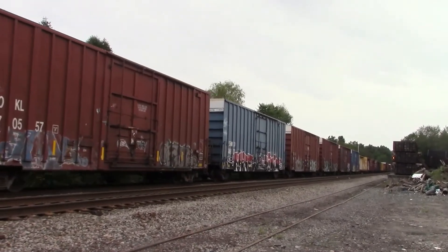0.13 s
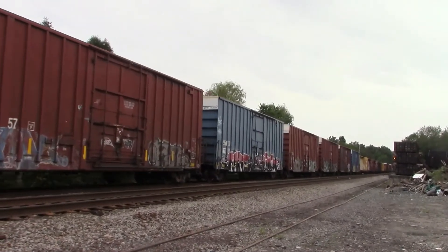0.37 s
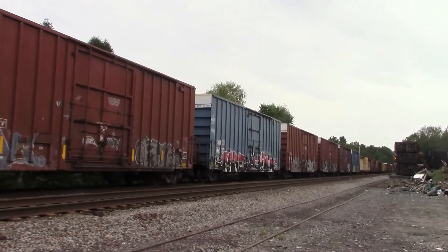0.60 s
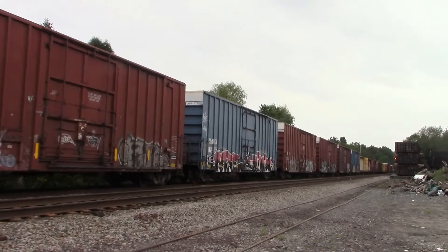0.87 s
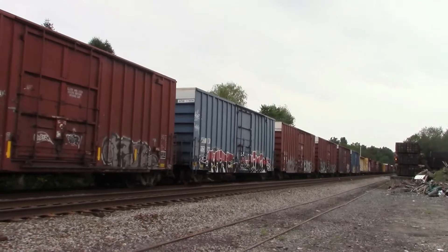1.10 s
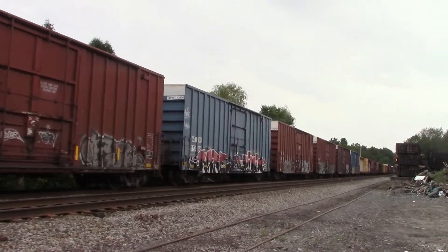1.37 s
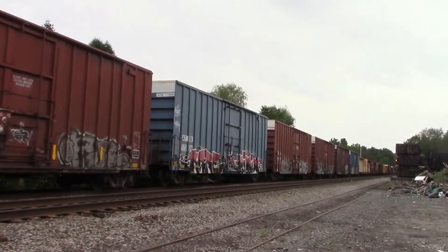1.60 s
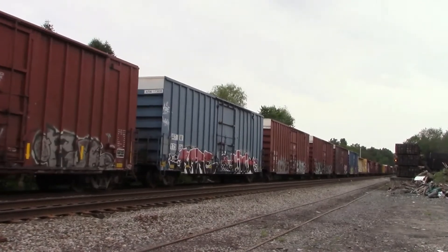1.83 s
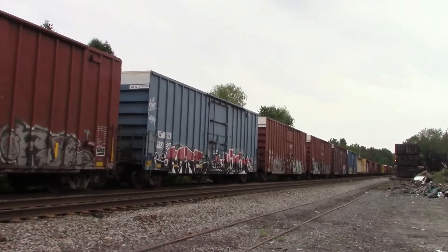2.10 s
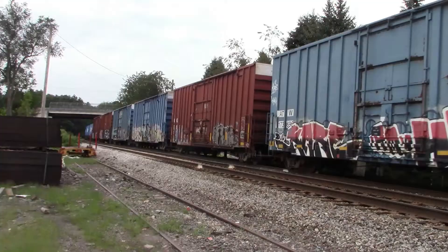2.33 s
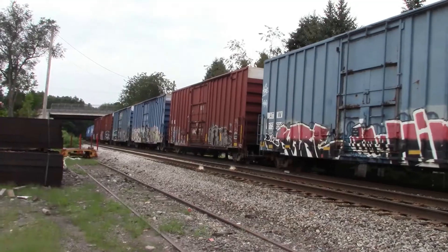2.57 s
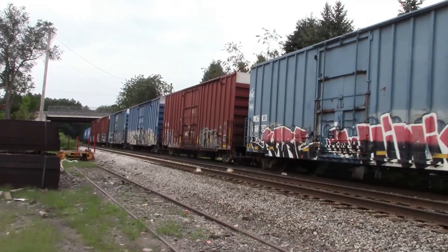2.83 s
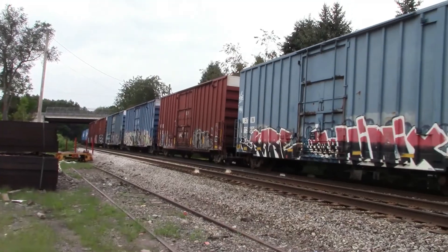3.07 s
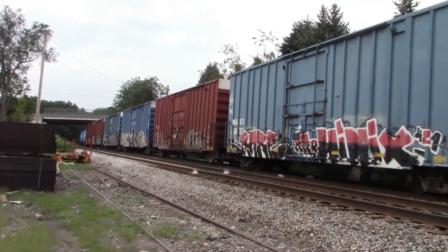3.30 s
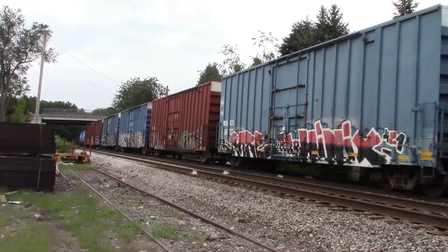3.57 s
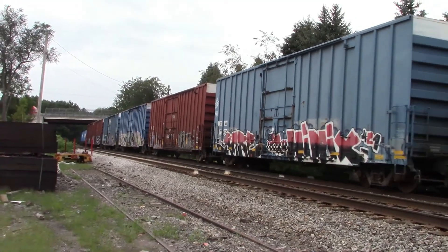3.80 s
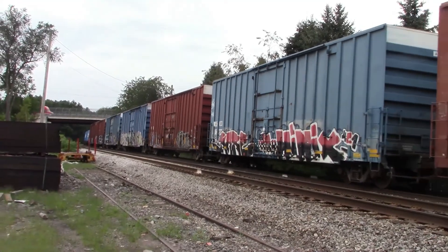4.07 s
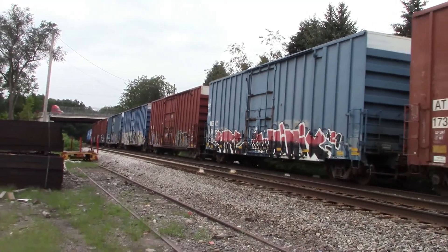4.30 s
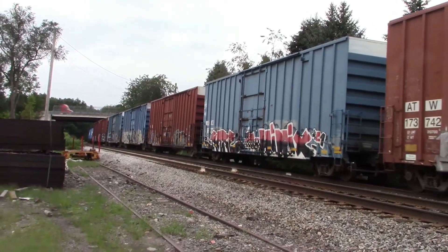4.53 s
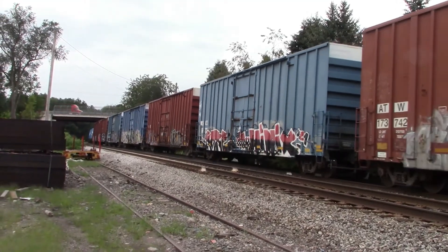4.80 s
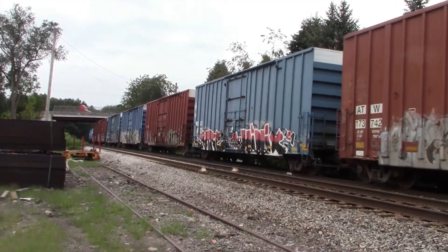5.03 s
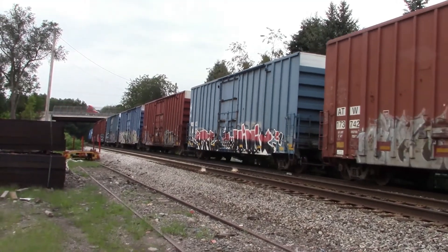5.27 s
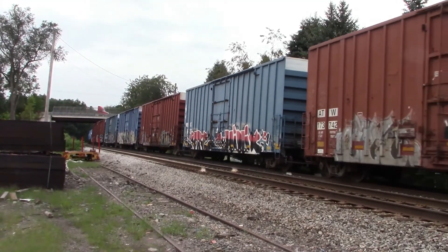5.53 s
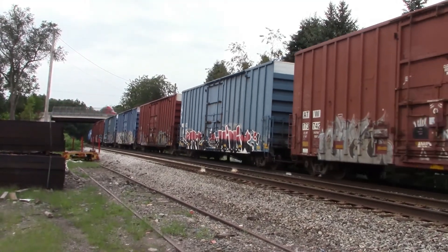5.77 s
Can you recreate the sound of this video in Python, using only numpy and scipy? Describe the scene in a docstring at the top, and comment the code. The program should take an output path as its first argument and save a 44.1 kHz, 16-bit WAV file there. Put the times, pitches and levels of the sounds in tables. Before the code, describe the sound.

Close, nearly centred stereo of boxcars rolling slowly over rail joints in the open air. Continuous low-mid rumble and fine loose-iron rattle carry irregular dull thuds, metallic clacks, short booms and wheel squeaks. High scraping hiss appears early; an abrupt brief silence separates the two views. Afterwards the roar surges more strongly about every 0.6 seconds, with dry ticks and a heavy final cluster.

```python
"""Slow boxcars on jointed track

A slow freight train passes a close pair of microphones beside the ballast, the cars nearly ahead.
Banded noise makes the rolling roar, swelling once a wheel turn; damped swings and bursts make the
thuds, knocks and clacks of joints and loose iron. Resonated noise and wavering sines make booming
bodies, ringing and squealing wheels, ticks and rattle. The sound drops out for a fifth of a second,
then fades back in with the roar coloured differently.
"""
import sys
import numpy as np
from scipy import signal
from scipy.io import wavfile
from scipy.ndimage import uniform_filter1d

SR = 44100
rng = np.random.default_rng(int(sys.argv[2]) if len(sys.argv) > 2 else 0)


def field_ratio(decibels):
    """Amplitude ratio for a level in dB (20 dB per decade); scalars and array-likes work."""
    return 10 ** (np.asarray(decibels, dtype=float) / 20)


def dump_mix(stems):
    """Bounce the given channels to the path in sys.argv[1] as a 16-bit WAV at rate SR."""
    frames = np.atleast_2d(stems).T  # one column per channel
    limited = np.clip(frames, -1, 1)  # hard clip at full scale
    pcm = np.round(limited * 32767).astype(np.int16)
    wavfile.write(sys.argv[1], SR, pcm)


N = 259749


def in_time(rows):
    """Columns of a curve at every sample."""
    s, *columns = np.transpose(rows)
    return np.array([np.interp(np.arange(N) / SR, s, c) for c in columns])


def at_hz(points, hz):
    """A spectrum read on a log-frequency axis."""
    f, value = np.transpose(points)
    return np.interp(np.log(hz), np.log(np.maximum(f, 1)), value)


def rms_one(x):
    """Scaled to rms 1."""
    return x / np.sqrt(np.mean(x ** 2) + 1e-20)


def drift(rate_hz):
    """Slow chance of spread 1: low-passed noise, drawn at every 40th sample."""
    r = np.exp(-2 * np.pi * rate_hz * 40 / SR)
    noise = rng.standard_normal(N // 40 + 2002)
    slow = rms_one(signal.lfilter([1], [1, -2 * r, r * r], noise)[2000:])
    return np.interp(np.arange(N) / 40, np.arange(len(slow)), slow)


def resonate(x, hz, width_hz):
    """Two-pole resonance, gain 1 on top."""
    r = np.exp(-np.pi * width_hz / SR)
    numerator = [(1 - r * r) / 2, 0, (r * r - 1) / 2]
    return signal.lfilter(numerator, [1, -2 * r * np.cos(2 * np.pi * hz / SR), r * r], x)


# A worn wheel loads the rail once a turn, about every 0.61 s:
# t/s, swell level/dB, tilt/dB per octave
WHEEL_TURNS = [(0.26, -0.5, 1.2), (0.87, 1, 1), (1.48, -2.5, 0), (2.08, -1, 0), (2.71, 3, -1.6),
               (3.331, 4, -0.5), (3.96, 3, -0.5), (4.57, 1.5, 1.3), (5.19, 3.5, -0.5), (5.81, 7.5, -3.4)]


def swells():
    """Swell and tilt in dB as a worn wheel turns: a rounded rise and a flatter-topped fall."""
    rise_s, fall_s = 0.08, 0.16
    swell_db, tilt_db, t = 0, 0, np.arange(N) / SR
    for s, db, tilt in WHEEL_TURNS:
        rise = ((s - t) / rise_s) ** 2
        fall = (abs(t - s) / fall_s) ** 4.1
        shape = np.exp(-np.where(t < s, rise, fall))
        swell_db, tilt_db = swell_db + db * shape, tilt_db + tilt * shape
    return swell_db, tilt_db


# Stereo width at the microphone pair: f/Hz, side minus mid level/dB
SIDE_SHARE = [(60, -34), (130, -41), (290, -26.5), (640, -23), (1410, -16), (3100, -12.5), (6820, -8),
              (15000, -21.5)]


def bands(low_hz, count):
    """Third-octave bands of mid and side noise, unrelated between neighbours: (centre, L and R)."""
    white = rng.standard_normal((2, 2, N + 4096))
    for k in range(count):
        low, high = low_hz * 2 ** (k / 3), low_hz * 2 ** ((k + 1) / 3)
        band = signal.butter(2, [low, high], "band", fs=SR, output="sos")
        mid, side = signal.sosfilt(band, white[k % 2])[:, 4096:]
        hz = np.sqrt(low * high)
        yield hz, mid + field_ratio(at_hz(SIDE_SHARE, hz)) * side * [[1], [-1]]


# Rolling spectrum beside the track: f/Hz, relative level per Hz/dB
ROAR = [(15, -57.5), (25, -19.5), (82, -1), (267, 1), (349, -7.5), (421, -5), (523, -9), (598, -7),
        (1050, -18.5), (2630, -23.5), (4380, -31), (5280, -38.5), (6920, -33.5), (10100, -50), (15500, -65)]
# How near and open to the ear the passing wheels are: t/s, level/dB, brightness/dB per octave
PASSING = [(0, -3, 0), (0.45, -1.5, -0.04), (0.75, -1.5, -0.5), (1.1, -1, 0.15), (1.36, -1.5, 0.5),
           (1.65, -1.5, 0.63), (2.1, -1, 0), (2.5, -2, 0), (2.9, -1.5, 0.86), (3.2, -2, -0.73),
           (3.75, 0, 0.22), (4.2, -1, 0.1), (4.45, 1, -0.5), (5.0, -1, 0), (5.4, 0.5, 0.5),
           (5.68, -1.5, 0.5), (5.89, -4.5, 1.5)]
# How strongly each pitch follows the swell: f/Hz, share of the swell
SWELL_REACH = [(60, 0.67), (150, 0.4), (250, 0.41), (550, 1.07), (1500, 0.84), (3000, 1.02), (8000, 0.45)]
# First view, colour added to the roar before the dropout: f/Hz, level/dB
FIRST_VIEW = [(60, 3), (130, 0.65), (300, 2), (600, 1.5), (1200, 1.5), (2800, 2.1), (6000, 1.4),
              (12000, -5.5)]


def rolling():
    """Rough wheel on rough rail: noise follows the passing wheels and turns, flickering partly in step."""
    level_db, bright_db = in_time(PASSING)
    swell_db, tilt_db = swells()
    first_view = np.arange(N) / SR < 2.2505   # ends within the silence
    together_db, out = drift(3.0) + 0.62 * drift(30), 0
    for hz, noise in bands(22.65, count=29):
        octaves = np.log2(hz / 800)
        view_db = at_hz(FIRST_VIEW, hz) * first_view
        near_db = level_db + bright_db * octaves
        turn_db = at_hz(SWELL_REACH, hz) * (swell_db + tilt_db * octaves)
        flicker_db = together_db + 1.2 * drift(8.7)
        out = out + field_ratio(at_hz(ROAR, hz) + view_db + near_db + turn_db + flicker_db) * noise
    return field_ratio(-15.5) * rms_one(out)


# Wheels dropping over joints, heard in the car body: t/s, main swing level/dB, f/Hz
THUDS = [(0.519, -5, 286), (0.806, -10, 269), (1.159, -9, 329), (1.461, -8.5, 276), (1.553, -14, 243),
         (1.625, -10.5, 277), (1.709, -12.5, 241), (1.748, -9.5, 281), (2.074, -15.5, 309),
         (2.448, -5, 182), (2.55, -11.5, 193), (2.663, -8.5, 386), (2.698, -10, 209), (3.276, -7, 240),
         (3.285, -4.5, 249), (3.317, -2.5, 239), (3.352, -13.5, 604), (3.912, -7, 232), (4.041, -29, 231),
         (4.092, -6.5, 224), (4.527, -7, 298), (5.232, -5.5, 198), (5.335, -13.5, 272), (5.385, -10, 207.6),
         (5.438, -10, 230), (5.491, -11, 204), (5.599, -14.5, 178), (5.788, -8, 458), (5.815, -8.5, 268),
         (5.838, -15, 293)]


def thuds():
    """A soft blow: the body swings up in a cycle or so and dies in a few."""
    cycles = 8.4   # for a 60 dB fall
    out = np.zeros(N)
    for (s, db, hz), (phase, phase_2) in zip(THUDS, rng.random((len(THUDS), 2))):
        start = round(s * SR)
        t = np.arange(min(4000, N - start)) / SR
        fall = field_ratio(-60 * t * hz / cycles)
        shape = (1 - np.exp(-t * hz / 2.2)) ** 2 * fall
        swing = np.sin(2 * np.pi * (hz * t + phase))
        swing += field_ratio(-8) * np.sin(2 * np.pi * (1.588 * hz * t + phase_2))
        # a higher knock dies faster still
        swing += field_ratio(-10) * fall * np.sin(2 * np.pi * (2.98 * hz * t + phase + phase_2))
        out[start:][:len(t)] += field_ratio(db) * shape / shape.max() * swing
    return out


# Hard, dull knocks of a wheel on a rail end: t/s, peak level/dB, length/s
KNOCKS = [(0.367, -4.5, 0.0078), (0.397, -12, 0.0045), (0.993, -7, 0.0064), (1.456, -7, 0.0062),
          (2.453, -5.5, 0.008), (2.508, -12, 0.006), (2.6, -5.5, 0.0065), (2.722, -4.5, 0.0068),
          (2.813, -13, 0.0044), (3.911, -5, 0.003), (3.958, -19, 0.0043), (4.161, -13, 0.0039),
          (3.975, -14, 0.005), (4.025, -8, 0.0045), (4.53, -9, 0.0043), (4.598, -6, 0.004),
          (5.151, -9, 0.0066), (5.741, -6.5, 0.0034), (5.787, -2, 0.0064)]


def knocks():
    """A push, a deep pull and a push back, over before anything rings."""
    out = np.zeros(N)
    for s, db, length in KNOCKS:
        phase = np.arange(round(length * SR)) / (length * SR)
        pulse = np.sin(np.pi * phase) * np.sin(3 * np.pi * phase)
        out[round(s * SR):][:len(phase)] += field_ratio(db) * pulse
    return out


# Iron on iron: t/s, relative level/dB at 4 kHz, brightness/dB per octave, 60 dB decay/s at 4 kHz
CLACKS = [(0.037, -20, -8.5, 0.21), (0.081, -21, 2, 0.15), (0.1387, -27.5, 12, 0.15),
          (0.2574, -16, 8, 0.23), (0.195, -27, -2, 0.39), (0.31, -20, -3, 0.22), (0.494, -15.5, -2, 0.6),
          (0.86, -16, 0.5, 0.3), (0.872, -15.5, 2.5, 0.36), (0.9194, -29, 10, 0.14),
          (1.458, -13.5, -3, 0.34), (1.6064, -6, 0.5, 0.11), (1.6165, -24.5, 4, 0.28),
          (1.707, -9.5, 1.5, 0.12), (1.8147, -16.5, -6, 0.39), (1.927, -16, -1.5, 0.12),
          (2.0713, -12.5, 0.5, 0.32), (2.453, -19.5, -12, 0.086), (2.534, -15.5, -6, 0.144),
          (2.709, -20, -8.5, 0.22), (2.7974, -24.5, -7.5, 0.62), (3.163, -23.5, -7, 0.32),
          (3.334, -19, -4, 0.17), (3.4884, -17, -6, 0.3), (3.7824, -22.5, 5.5, 0.66),
          (3.8626, -26.5, 4, 0.11), (3.9304, -23, -6, 0.15), (3.9644, -18, -9.5, 0.18),
          (4.072, -19, -3, 0.65), (4.1594, -35, 21, 0.18), (4.4164, -17, 3, 0.16), (4.555, -15, -4, 0.18),
          (4.5735, -21, -7.5, 0.46), (4.9701, -18, -6, 0.045), (5.0487, -10.5, 1, 0.089),
          (5.16, -27, -6.5, 0.25), (5.195, -13, 0.5, 0.23), (5.3, -18.5, -5.5, 0.28),
          (5.349, -13.5, -3.5, 0.2), (5.4494, -22, 8, 0.12), (5.5342, -23.5, 12.5, 0.082),
          (5.7544, -29.5, 16, 0.15), (5.787, -18, -7.5, 0.35), (5.835, -14.5, 0, 0.2)]


def strikes(hz):
    """Envelope of all clacks at one pitch: treble dies sooner, each blow has its own colour."""
    rise_s, colour_db = 0.0022, 2.0
    out = np.zeros(N)
    for (s, db, bright_db, t60), own in zip(CLACKS, rng.standard_normal(len(CLACKS))):
        start = round(s * SR)
        t = np.arange(min(9000, N - start)) / SR
        fall = field_ratio(-60 * t / max(t60, 0.02) * (hz / 4000) ** 0.27)
        level_db = db + bright_db * np.log2(hz / 4000) + colour_db * own
        out[start:][:len(t)] += field_ratio(level_db) * fall * (1 - np.exp(-t / rise_s))
    return out


# Common spectrum of the clacks: f/Hz, relative level per Hz/dB
CLACK_COLOUR = [(350, -29), (600, -19), (1270, -8.5), (2440, -13), (3570, -6.5), (3920, -8), (5980, -20.5),
                (6850, -10), (15500, -67.5)]


def clacks():
    """Many close plate and rail modes at once: a burst that dies band by band."""
    out = 0
    for hz, noise in bands(703, count=14):
        out = out + field_ratio(at_hz(CLACK_COLOUR, hz)) * strikes(hz) * noise
    return field_ratio(5.0) * out


# The car body booms under a heavy wheel: t/s, length/s, f/Hz, rms level/dB before waver, width/Hz
BOOMS = [(1.47, 0.17, 275, -18, 45), (3.408, 0.05, 272, -15.5, 40), (3.95, 0.16, 234.6, -17.5, 45.6)]


def booms():
    """A body mode held by the load: noise twice through one resonance, evened, between soft edges."""
    edge_s, waver_db = 0.0096, 4.5
    out = np.zeros(N)
    for s, length, hz, db, width_hz in BOOMS:
        start = round(s * SR)
        n = min(round(length * SR), N - start)
        tone = resonate(resonate(rng.standard_normal(30000), hz, width_hz), hz, width_hz)
        even = tone / np.sqrt(abs(uniform_filter1d(tone ** 2, size=600)) + 1e-20)
        t = np.arange(n) / SR
        edges = np.clip(np.minimum(t, length - t) / edge_s, 0, 1)
        level = field_ratio(db + waver_db * drift(35)[start:start + n])
        out[start:start + n] += level * edges * even[-n - 600:-600]
    return out


# Flange rubbing the rail: t/s, hold/s, relative level/dB
RUBS = [(0.999, 0.085, 5.5), (1.1, 0.19, 3.5), (1.36, 0.05, -2), (2.11, 0.071, 2.5), (4.129, 0.12, -2),
        (5.449, 0.016, -2), (5.567, 0.078, -1.5), (5.774, 0.12, -1.5)]


def rubbing_db():
    """A light touch throughout; each rub sets in fast, holds and lets go."""
    attack_db_per_s, release_db_per_s, light_db = 348, 118, -12.5
    out, t = np.full(N, light_db), np.arange(N) / SR
    for s, hold, db in RUBS:
        before = attack_db_per_s * np.maximum(s - t, 0)
        after = release_db_per_s * np.maximum(t - s - hold, 0)
        out = np.maximum(out, db - before - after)
    return out


def flange_hiss():
    """Rubbing makes a broad hiss of band-passed noise, mostly in the middle."""
    band = signal.butter(3, [7300, 10660], "band", fs=SR, output="sos")
    mid, side = signal.sosfilt(band, rng.standard_normal((2, N)))
    hiss = rms_one(mid + 0.14 * side * [[1], [-1]])
    return field_ratio(-44 + rubbing_db() + drift(40)) * hiss


# Narrow modes of the wheel: f/Hz, relative level/dB
WHEEL_MODES = [(1510, -49.5), (2270, -50.5), (2500, -56), (2640, -47), (3050, -57), (3320, -68),
               (3800, -53), (4500, -53.5), (4861, -54.5), (6794, -58), (7020, -59), (7500, -57),
               (8263, -65.5), (8662, -71.5), (9760, -65.5), (10150, -69.5), (10487, -71), (10858, -75),
               (11558, -76.5)]


def wheel_ring():
    """The rubbing flange and the clacks feed noise into the wheel's narrow modes."""
    rub_db, width_hz, out = rubbing_db(), 28.0, np.zeros((2, N))
    for hz, db in WHEEL_MODES:
        mid, side = rng.standard_normal((2, N))
        noise = mid + field_ratio(at_hz(SIDE_SHARE, hz)) * side * [[1], [-1]]
        rub = field_ratio(rub_db + 3 * drift(6))   # each mode comes and goes
        drive = noise * (rub + field_ratio(19.5) * strikes(hz))
        narrow_gain = np.sqrt(2 * SR / (np.pi * width_hz))   # makes up for the narrow band
        out += field_ratio(db) * resonate(drive, hz, width_hz) * narrow_gain
    return out


# Short rings and squeaks: t/s, length/s, f/Hz, level/dB before envelope and grip
SQUEAKS = [(0.252, 0.026, 1810, -28.5), (1.923, 0.05, 7100, -48), (2.076, 0.07, 6940, -35),
           (2.078, 0.026, 2330, -23), (2.067, 0.034, 1540, -29), (2.565, 0.017, 5900, -38),
           (2.696, 0.027, 1420, -22.5), (2.828, 0.074, 6900, -36), (3.333, 0.026, 2230, -25.5),
           (3.333, 0.024, 1650, -23), (3.641, 0.052, 9400, -46), (3.924, 0.046, 2300, -24.5),
           (3.928, 0.014, 2700, -26), (4.733, 0.043, 7940, -43), (5.505, 0.021, 5460, -38),
           (5.51, 0.05, 3960, -35), (5.6, .02, 3700, -35), (1.713, 0.016, 6600, -34.5),
           (5.795, 0.088, 2590, -31), (5.785, 0.029, 2190, -30)]


def squeaks():
    """One mode sings briefly and roughly: noise twice through a resonance, the shorter the wider."""
    out, grip = np.zeros(N), field_ratio(1.5 * drift(25))   # the contact grips and slips
    for s, length, hz, db in SQUEAKS:
        start = round(s * SR)
        n = min(round(length * SR), N - start)
        width_hz = 25 + 5.5 / length + hz / 300
        tone = resonate(resonate(rng.standard_normal(22000), hz, width_hz), hz, width_hz)[-n:]
        tone = tone / np.sqrt(abs(uniform_filter1d(tone ** 2, size=2200)))   # friction keeps it going
        hump = abs(np.sin(np.pi * (np.arange(n) / n) ** 0.45)) ** 0.8   # rises fast, falls slower
        out[start:start + n] += field_ratio(db) * hump * tone * grip[start:start + n]
    return out


# Thin, held wheel squeals: t/s, length/s, f/Hz, rms level/dB before waver, pitch waver/Hz
SQUEALS = [(0.17, 0.18, 3741, -38, 7), (0.18, 0.08, 3036, -40, 9), (0.23, 0.09, 4183, -43, 9),
           (0.24, 0.05, 1976, -33, 12), (0.3, 0.045, 2000, -33, 15), (0.34, 0.05, 1600, -33, 30),
           (0.87, 0.07, 2580, -37, 10), (0.96, 0.13, 4500, -43, 12), (1.11, 0.19, 4500, -44, 16),
           (0.99, 0.09, 2492, -39, 30), (1.16, 0.19, 2680, -44, 20), (1.44, 0.08, 4522, -42, 10),
           (1.0, 0.08, 7919, -50, 15), (0.99, 0.34, 9760, -57, 20), (0.99, 0.34, 10858, -58, 15),
           (0.99, 0.34, 11558, -64, 20), (4.647, 0.032, 2770, -30, 10), (5.55, 0.14, 2589, -41, 10),
           (5.52, 0.14, 7590, -53, 15), (5.78, 0.11, 3854, -37, 4), (5.79, 0.075, 4183, -43, 8),
           (5.78, 0.05, 1523, -31, 12)]


def squeals():
    """Stick-slip locks onto one wheel mode: a near sine whose pitch and level waver."""
    edge_s, waver_db = 0.015, 3.0
    out, wavers = np.zeros(N), np.array([drift(30), drift(30)])
    shifts = rng.integers(0, N // 2, len(SQUEALS))   # each squeal reads its own stretch of waver
    for (s, length, hz, db, waver_hz), shift in zip(SQUEALS, shifts):
        start = round(s * SR)
        t = np.arange(min(round(length * SR), N - start)) / SR
        pitch, level = wavers[:, shift:shift + len(t)]
        edges = np.clip(np.minimum(t, length - t) / edge_s, 0, 1)
        turns = np.cumsum(hz + waver_hz * pitch) / SR
        tone = np.sqrt(2) * np.sin(2 * np.pi * turns + shift)
        out[start:start + len(t)] += field_ratio(db + waver_db * level) * edges * tone
    return out


# A loose part ticking, dry and short: t/s, peak level/dB, f/Hz
TICKS = [(2.378, -22, 4000), (4.574, -23, 6150), (4.650, -27.5, 8500), (4.809, -26, 7350),
         (4.893, -27, 5000), (4.975, -22.5, 4000), (5.049, -20, 4900), (5.129, -33, 4500),
         (5.214, -29, 4510), (5.288, -19, 4400), (5.364, -25, 4300), (5.443, -28, 4000), (5.520, -34, 3800),
         (5.606, -20, 3830), (5.632, -29, 10600), (5.673, -21, 3630), (5.871, -26, 9830)]


def ticks():
    """A small part is tapped: a few milliseconds of noise through one broad resonance."""
    sharpness = 1.7
    out, t = np.zeros(N), np.arange(700) / SR
    for (s, db, hz), noise in zip(TICKS, rng.standard_normal((len(TICKS), 700))):
        tick = noise * t * np.exp(-t / 0.0014)
        for _ in range(3):   # steep skirts
            tick = resonate(tick, hz, hz / sharpness)
        out[round(s * SR):][:len(t)] += field_ratio(db) * tick / abs(tick).max()
    return out


def rattle():
    """Loose iron all along the cars: soft chance taps, each swelling in one of many small parts."""
    taps_per_s, level_db, tilt_db, parts = 250.0, -42.5, 5.0, 30
    sizes_db = 2.5 * np.minimum(rng.exponential(1, N), 4)
    taps = field_ratio(sizes_db) * (rng.random(N) < taps_per_s / SR)
    taps = taps * field_ratio(1.47 * swells()[0])   # dB of rattle per dB of swell
    dealt, out = rng.integers(0, parts, N), np.zeros((2, N))
    pitches = np.geomspace(1500, 9000, parts) * rng.uniform(0.96, 1.04, parts)
    for k, hz in enumerate(pitches):
        width_hz = 20 + hz / 250
        ring = resonate(resonate(taps * (dealt == k), hz, width_hz), hz, 4 * width_hz)
        ring = ring * SR / (np.pi * width_hz)
        pan_db = rng.uniform(-1.2, 1) * np.array([[1], [-1]])
        out += field_ratio(level_db - tilt_db * np.log2(hz / 2000) + pan_db) * ring
    return out


def scene():
    """All sources lie nearly ahead of a close pair of microphones."""
    blows = thuds() + knocks() + clacks() + booms()
    wheels = flange_hiss() + wheel_ring() + squeaks() + squeals()
    return rolling() + blows + wheels + ticks() + rattle()


# Fuller left microphone: t/s, share of bass gained left and lost right
LEFT_FULLER = [(0, 0.024), (2.2, 0.023), (2.4, 0.019), (5.89, 0.017)]


def microphones(dry):
    """The pair loses the deepest bass; the left one is slightly fuller."""
    x = signal.sosfilt(signal.butter(2, 42, "high", fs=SR, output="sos"), dry)
    bass = signal.sosfilt(signal.butter(2, 900, fs=SR, output="sos"), x)
    return x + in_time(LEFT_FULLER)[0] * bass * [[1], [-1]]


def dropout_gain():
    """Full level, a step down and quick fall to silence, then a short fade-in."""
    cut_s, step_db, fall_db_per_s = 2.1505, -20, 1450
    resume_s, fade_in_s, fade_in_power = 2.36, 0.034, 2.46
    t = np.arange(N) / SR
    falling = field_ratio(step_db - fall_db_per_s * np.maximum(t - cut_s, 0))
    going = np.where(t < cut_s, 1, falling)
    fade_in = np.clip((t - resume_s) / fade_in_s, 0, 1) ** fade_in_power
    return np.where(t < resume_s, going, fade_in)


def top_cut(x):
    """Nothing passes above the cut-off."""
    return signal.sosfilt(signal.butter(12, 15700, fs=SR, output="sos"), x)


def record(dry):
    """The microphone pair, rounded peaks, the dropout and a small left-right balance."""
    rounded = 1.055 * np.tanh(microphones(dry) / 1.148)
    balance = field_ratio(0.14 / 2 * np.array([[1], [-1]]))   # left 0.14 dB over right
    mix = rounded * dropout_gain() * balance
    return top_cut(mix)


dry = scene()
out = record(dry)
dump_mix(out)
```